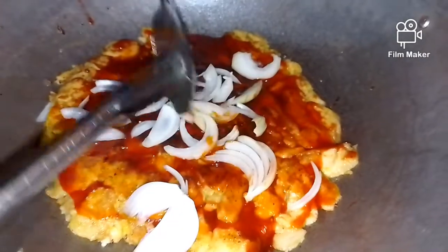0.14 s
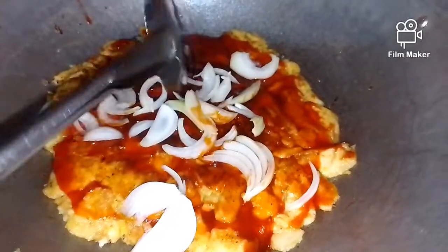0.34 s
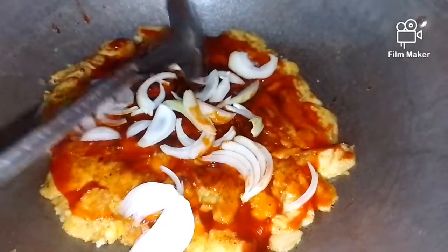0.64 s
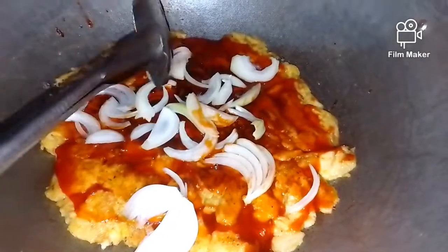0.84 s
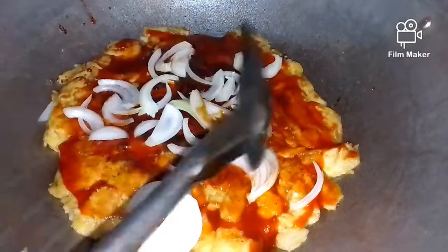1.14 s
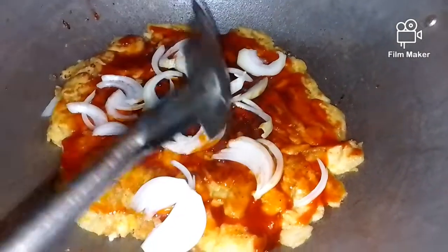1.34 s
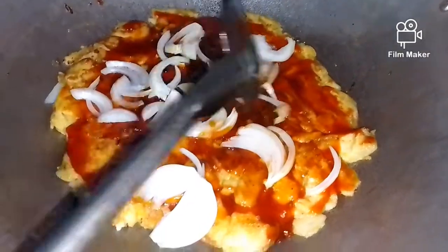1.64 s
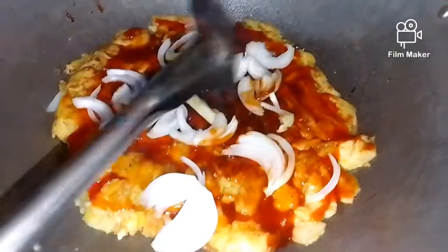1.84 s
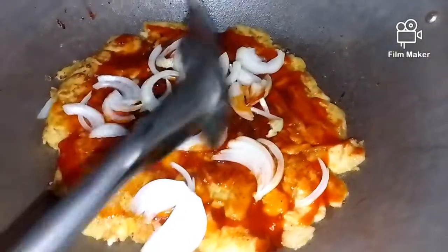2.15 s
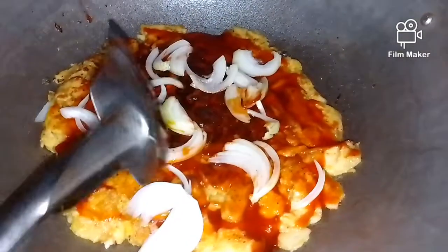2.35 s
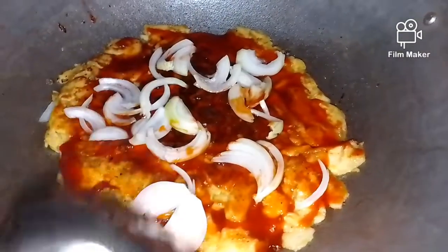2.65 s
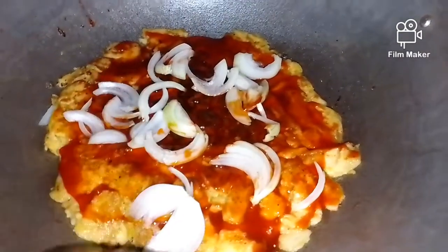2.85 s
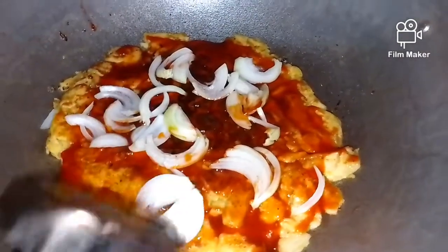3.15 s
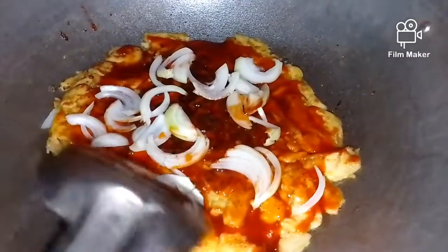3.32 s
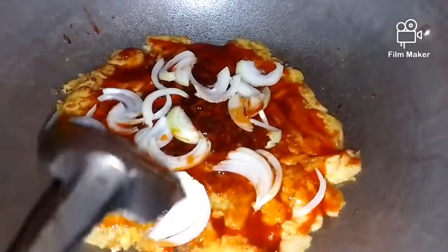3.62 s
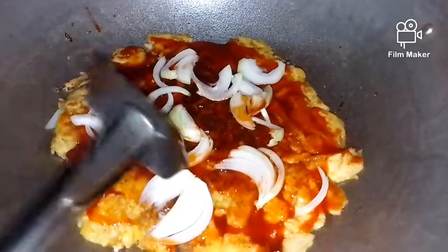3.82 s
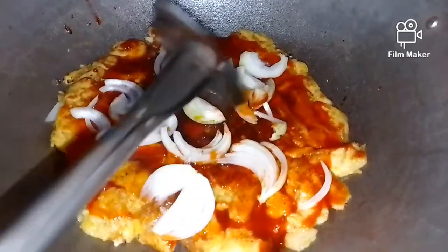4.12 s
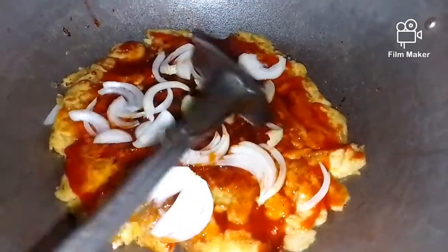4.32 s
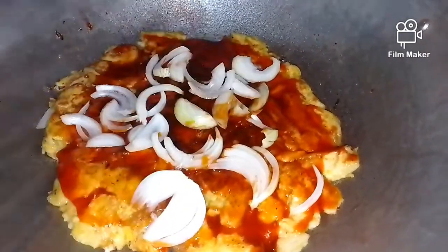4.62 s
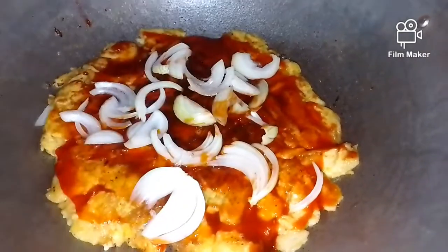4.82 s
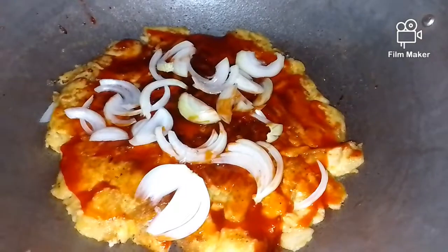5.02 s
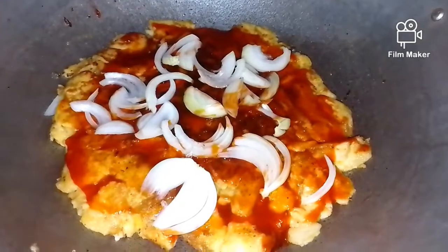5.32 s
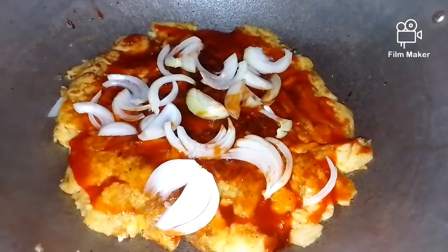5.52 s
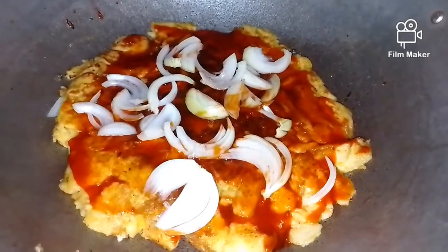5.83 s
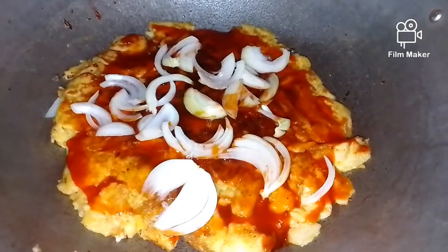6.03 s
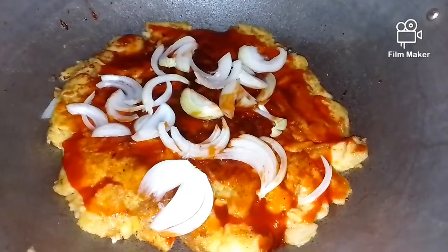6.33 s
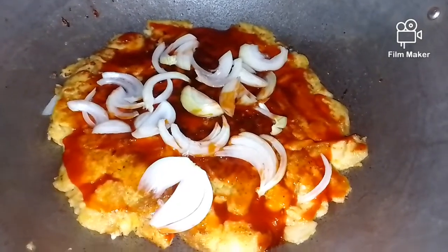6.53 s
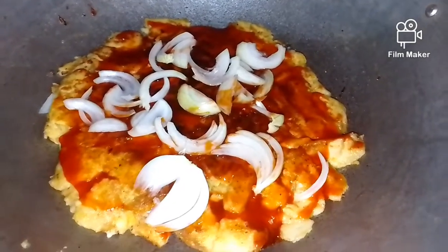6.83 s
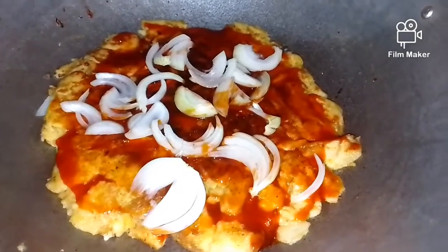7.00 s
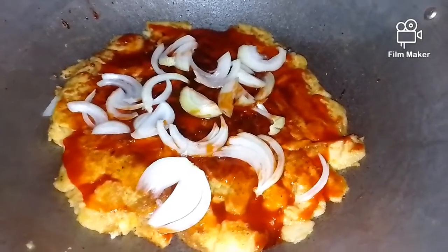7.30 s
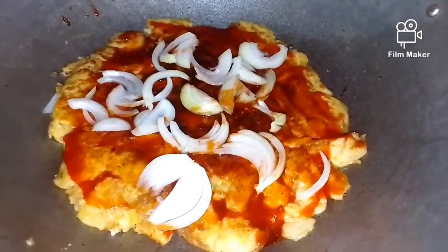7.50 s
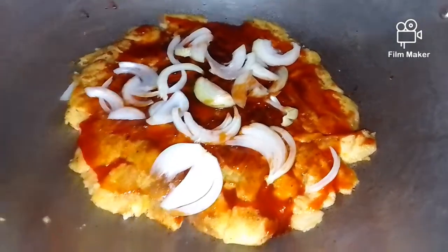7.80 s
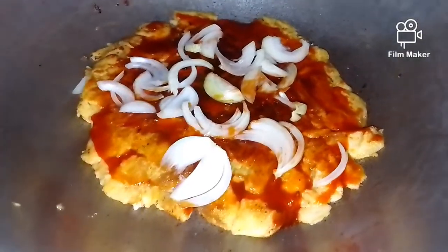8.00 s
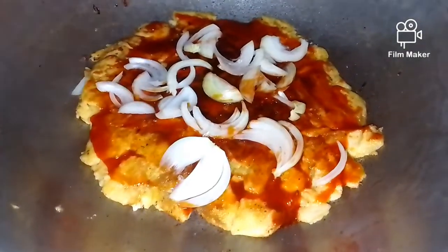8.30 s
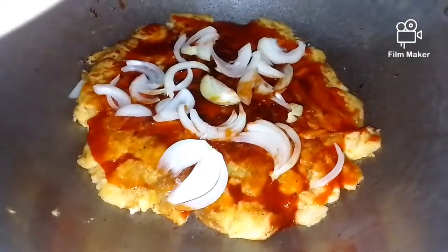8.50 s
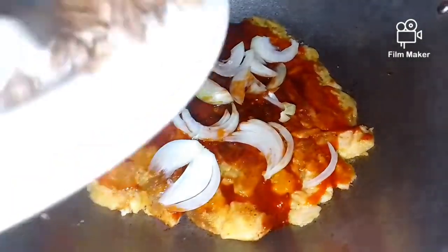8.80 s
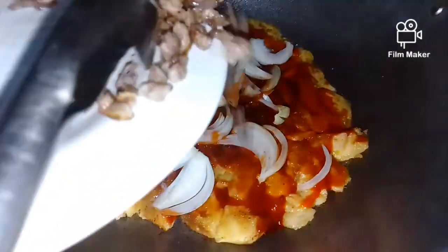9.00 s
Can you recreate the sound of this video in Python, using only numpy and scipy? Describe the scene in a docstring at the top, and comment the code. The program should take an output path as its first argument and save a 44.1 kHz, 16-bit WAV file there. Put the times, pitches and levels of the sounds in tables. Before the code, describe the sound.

A phone held near a griddle picks up sparse, light crackling at first, with a couple of soft bumps. A utensil lands with a bright double clank, scrapes and drops flat; livelier frying follows, with dull pops, fine spits and one strong snap. A faint low hum swells later beneath the rumble. Soft handling bumps precede a metallic knock and short rubbing scrapes, all in a short, small room ring.

```python
"""Food frying on a steel griddle

Steam pockets burst in clusters (short filtered clicks) and fat spits finely over a low burner rumble (noise).
A metal spatula is put down with a clank, slides and settles; later a metal dish is knocked and dragged.
Both ring as sums of fading tones. A few soft bumps are fading low tones with a rattle.
A phone close above the plate hears it all, with the short ring of a small kitchen."""
import sys
import numpy as np
from scipy import signal
from scipy.fft import rfft, irfft
from scipy.io import wavfile

SR = 44100
rng = np.random.default_rng(int(sys.argv[2]) if len(sys.argv) > 2 else 0)


def store_wav(level_fs):
    """Save 16-bit WAV to argv[1]."""
    pcm = np.round(np.clip(np.atleast_2d(level_fs), -1, 1) * 32767)
    wavfile.write(sys.argv[1], SR, pcm.T.astype(np.int16))


N = 403515
TIME = np.arange(N) / SR  # s

# tone colour of a short burst, also of metal on the plate: (frequency [Hz], level [dB])
POP_COLOUR = [(60, -11), (200, -12), (330, -7), (520, -1.5), (900, -2), (1400, -4.5), (1850, 3.5),
              (2300, -2), (2650, -9.5), (3100, -6.5), (4000, -5), (4800, -17.5), (6800, -33.5), (8000, -45),
              (11000, -43.5), (15500, -49)]
# tone colour of a droplet of fat: (frequency [Hz], level [dB])
SPIT_COLOUR = [(1000, -24), (3800, 13.5), (5300, 6), (7000, -2), (8000, -7), (11000, -9), (13000, -29),
               (15500, -39)]


def undb(db):
    """Turn decibels into a gain."""
    return 10 ** (np.asarray(db) / 20)


def unit(x):
    """Scale a sound to an average (rms) level of 1."""
    return x / np.sqrt(np.mean(x ** 2))


def swell(full_s, attack_s, hold_s, release_s, db):
    """Gain that rises, holds and dies away; attack and release each span 30 dB."""
    before = np.maximum(full_s - TIME, 0) / attack_s
    after = np.maximum(TIME - full_s - hold_s, 0) / release_s
    return undb(db - 30 * np.minimum(before + after, 10))


def fade(t, t60):
    """Exponential decay by 60 dB in t60 seconds."""
    return np.exp(-np.log(1000) * t / t60)


def through(x, response):
    """Pass a sound through an impulse response."""
    return signal.oaconvolve(x, response)[:len(x)]


def add(out, s, sound):
    """Mix a sound in at time s (seconds)."""
    i = int(s * SR)
    out[i:i + len(sound)] += sound[:len(out[i:])]


def wander(span_s):
    """Smooth random curve that changes over about span_s seconds; rms 1."""
    return unit(through(rng.standard_normal(N), np.hanning(int(span_s * SR))))


def dull_noise(size, top_hz):
    """Noise that weakens steeply above top_hz; rms 1."""
    lowpass = signal.butter(4, top_hz, fs=SR, output="sos")
    return unit(signal.sosfilt(lowpass, rng.standard_normal(size)))


def clicks(rate, spread_db, cap=4):
    """Random clicks, about rate per second, many small and a few large; rms 1."""
    out, count = np.zeros(N), int(rate * N / SR)
    when, size, sign = rng.random((count, 3)).T
    gain = undb(spread_db * np.minimum(-np.log(size), cap))
    out[(when * N).astype(int)] = np.sign(sign - .5) * gain
    return unit(out)


def colour(points, bright_db=0, bright_hz=3800, width=0.13, top_db=0, size=1024):
    """Filter response with the given spectrum, a hump at bright_hz and more or less treble."""
    hz = np.maximum(np.fft.rfftfreq(size, 1 / SR), 1)
    point_hz, point_db = np.transpose(points)
    db = np.interp(np.log(hz), np.log(point_hz), point_db)
    db = db + bright_db * np.exp(-(np.log(hz / bright_hz) / width) ** 2)
    db = db + top_db / (1 + (5500 / hz) ** 6)
    # fold the cepstrum so that the response starts at once (minimum phase)
    cepstrum = irfft(np.log(undb(db)))
    cepstrum[1:size // 2] *= 2
    cepstrum[size // 2 + 1:] = 0
    return irfft(np.exp(rfft(cepstrum)))


def ring(modes, twin_db=-9, twin_spread=.022):
    """Fading tones of alternating sign, each beating against a weaker, shorter twin close in pitch."""
    t, out = TIME[:SR // 4], 0
    for k, (hz, db, t60) in enumerate(modes):
        twin_hz = hz * (1 + twin_spread * rng.choice([-1, 1]) * rng.uniform(.5, 2))
        tone = np.sin(2 * np.pi * hz * t)
        # the twin fades by both its own decay and the shared one below
        twin = undb(twin_db) * fade(t, t60 * 2) * np.sin(2 * np.pi * twin_hz * t)
        out = out + (-1) ** k * undb(db) * fade(t, t60) * (tone + twin)
    return out


def wavering_tone(hz):
    """Steady tone whose pitch wavers slightly; rms 1."""
    cycles = np.cumsum(hz * (1 + .02 * wander(.2))) / SR
    return np.sqrt(2) * np.sin(2 * np.pi * cycles)


def burner(level_db=-53.9, hum_hz=102.3, upper_hz=135, upper_db=-7, hum_rest_db=-65):
    """Steady rumble of filtered noise, with a low hum of two wavering tones that swells once."""
    # spectrum of the rumble: (frequency [Hz], level [dB])
    rumble_colour = [(15, -7), (26, -.5), (60, 3.5), (80, 0), (135, -0.5), (200, -6.5), (290, -16.5),
                     (550, -15.5), (625, -6.5), (720, -15.5), (2000, -25), (6000, -50.5), (15000, -60.5)]
    # swell of the hum: (full from [s], attack [s], hold [s], release [s], level [dB])
    hum_swell = (6.8, 1.1, .45, 1.6, -53.5)
    rumble = unit(through(rng.standard_normal(N), colour(rumble_colour, size=8192)))
    hum = wavering_tone(hum_hz) + undb(upper_db) * wavering_tone(upper_hz)
    hum = hum * undb(1.5 * wander(.25))
    return undb(level_db) * rumble + np.maximum(swell(*hum_swell), undb(hum_rest_db)) * hum


def bumps(rattle_db=-6, rattle_t60=.07):
    """Soft bumps: a quickly fading tone with a brief rattle of noise, and a dull shuffle of handling."""
    # (time [s], level [dB], pitch [Hz], decay by 60 dB [s], top of the rattle [Hz])
    soft_bumps = [(1.0123, -30.5, 200, .027, 380), (1.539, -33, 170, .035, 520), (1.554, -37, 90, .05, 200),
                  (6.70, -38, 216, .07, 600), (7.709, -36.5, 162, .1, 1100), (7.898, -39, 720, .035, 1200),
                  (8.195, -31, 185, .14, 1150)]
    # (full from [s], attack [s], hold [s], release [s], level [dB])
    shuffle_swell = (7.71, .1, .2, .5, -46.5)
    # spectrum of the shuffle: (frequency [Hz], level [dB])
    shuffle_colour = [(50, -34), (95, 2), (260, -6), (450, -16), (1200, -24), (4000, -69)]
    out, t = np.zeros(N), TIME[:SR // 4]
    for s, db, hz, t60, rattle_hz in soft_bumps:
        tone = fade(t, t60) * np.sin(2 * np.pi * hz * t)
        rattle = dull_noise(len(t), rattle_hz) * fade(t, min(t60, rattle_t60))
        add(out, s, undb(db) * (tone + undb(rattle_db) * rattle))
    shuffle = unit(through(rng.standard_normal(N), colour(shuffle_colour)))
    return out + swell(*shuffle_swell) * shuffle


def strike(blows, modes, ring_db, clatter_db, clatter_t60, bright_db, top_db,
           thud_db=-23, thud_hz=800, thud_t60=.17):
    """Each blow rings the metal, with a short clatter of the plate beneath and its longer, low thud."""
    out, t = np.zeros(N), TIME[:SR // 4]
    plate = colour(POP_COLOUR, bright_db, width=0.87, top_db=top_db)
    for s, db in blows:
        clatter = unit(through(rng.standard_normal(len(t)), plate)) * fade(t, clatter_t60)
        thud = dull_noise(len(t), thud_hz) * fade(t, thud_t60)
        blow = undb(ring_db) * ring(modes) + undb(clatter_db) * clatter + undb(thud_db) * thud
        add(out, s, undb(db) * blow)
    # the contact takes a moment, which rounds off the highest treble
    return through(out, np.array([1, 2, 1]) / 4)


def slide(stroke, modes, grit_db, grit_top_db, soft_hz, spread, wobble, tuning=1, glide=0):
    """Tiny, uneven catches of metal on metal excite tones that waver and glide as the contact moves."""
    grip = undb(3 * unit(through(rng.standard_normal(N), np.hanning(SR // 100))))
    catches = grip * clicks(rate=1100, spread_db=3.2)
    full_s, attack_s, hold_s, release_s, _ = stroke
    start, end = full_s - attack_s, full_s + hold_s + release_s
    # glide is in octaves per s, wobble in octaves
    octaves = glide * (np.clip(TIME, start, end) - (start + end) / 2) + wobble * wander(.03)
    pitch = tuning * 2 ** octaves
    # a catch has a typical duration, so it pushes hardest around soft_hz
    band = signal.butter(1, [soft_hz / spread, soft_hz * spread], "band", fs=SR, output="sos")
    push = signal.sosfilt(band, catches)
    steady = unit(through(push, ring(modes)))
    # reading the sound faster or slower bends its pitch
    singing = np.interp(np.cumsum(pitch) % N, np.arange(N), steady)
    grit = unit(through(catches, colour(POP_COLOUR, top_db=grit_top_db)))
    return swell(*stroke) * (singing + undb(grit_db) * grit)


def dish():
    """The dish is knocked, rings until pressed down, then is dragged in short pulls that sink in pitch."""
    # blows: (time [s], level [dB])
    knocks = [(8.6993, -16.5), (8.7208, -24)]
    # tones of the ringing dish: (frequency [Hz], level [dB], decay by 60 dB [s])
    dish_modes = [(165, -14, .09), (440, -12, .05), (540, -14, .11), (680, -11, .06), (850, -11, .05),
                  (995, -14, .08), (1077, 0, .13), (1442, -1, .07), (1608, -16, .12), (1743, -16, .12),
                  (2319, -12, .08), (3300, -14, .04), (4050, -12, .04), (6600, -19, .04)]
    # (full from [s], hold [s], level [dB], where the catches push hardest [Hz], pitch ratio [1])
    drags = [(8.762, .03, -47, 4600, 1.0), (8.815, .055, -43.5, 2100, 1.0), (8.922, .025, -44, 900, .93)]
    # tones of the dragged dish at pitch ratio 1: (frequency [Hz], level [dB], decay by 60 dB [s])
    rub_modes = [(600, -7, .05), (845, 2, .08), (1190, -1, .03), (1820, 2, .07), (2060, -1, .04),
                 (3500, 5, .008), (6000, 0, .005)]
    edge_s = .07  # attack and release of a pull
    pressed_s, pressed_t60 = 8.738, .06  # pressing the dish down chokes its ring
    blows = strike(knocks, dish_modes, ring_db=-3.5, clatter_db=-6.5, clatter_t60=.05,
                   bright_db=4.5, top_db=19)
    out = blows * fade(np.maximum(TIME - pressed_s, 0), pressed_t60)
    for s, hold_s, db, hz, tuning in drags:
        out += slide((s, edge_s, hold_s, edge_s, db), rub_modes, grit_db=-4, grit_top_db=12,
                     soft_hz=hz, spread=1.6, tuning=tuning, glide=-.8, wobble=.008)
    return out


def spatula_modes(flat):
    """The spatula's tones for a contact between its edge (0) and its flat (1)."""
    # (frequency [Hz], level on the edge [dB], level on the flat [dB], decay by 60 dB [s])
    blade = [(945, -7, 0, .08), (1104, -6, -13, .14), (1500, -10, -9, .15), (1670, -6, -10, .09),
             (1790, -10, -4, .08), (1890, -6, -1, .11), (2116, -7, -11, .12), (2205, 0, -12, .08),
             (2400, -4, -17, .045), (3149, -4, -17, .15), (3262, -6, -14, .11), (3355, -7, 0, .07),
             (3511, -5, -8, .13), (3790, -5, -8, .09), (3990, -6, -6, .07), (4185, -3, -6, .07),
             (4545, -6, -12, .07), (4891, -7, -9, .06), (5200, -11, -18, .07), (7300, -17, -34, .03),
             (9500, -18, -38, .03)]
    return [(hz, edge_db + flat * (flat_db - edge_db), t60) for hz, edge_db, flat_db, t60 in blade]


def spatula(flat_dull_db=9):
    """The spatula lands on its edge, bounces, slides and drops flat with a duller clink."""
    # blows: (time [s], level [dB], contact [0 = edge to 1 = flat])
    clanks = [(2.7858, -19.5, 0), (2.7975, -26, 0), (3.0367, -30, 1)]
    # (full from [s], attack [s], hold [s], release [s], level [dB])
    stroke = (2.922, .07, .036, .07, -34.5)
    out = slide(stroke, spatula_modes(1), grit_db=-5, grit_top_db=9,
                soft_hz=1600, spread=1.6, wobble=.008)
    for s, db, flat in clanks:
        out += strike([(s, db)], spatula_modes(flat), ring_db=-3.5, clatter_db=-3, clatter_t60=.08,
                      bright_db=5, top_db=17 - flat_dull_db * flat)
    return out


def spits(level_db=4):
    """Single droplets of fat snap or sizzle away in a moment of tiny splashes: fading noise."""
    # (time [s], peak before level_db is added [dB], decay by 60 dB [s])
    droplets = [(3.4264, -40, .006), (4.2946, -37, .008), (4.9417, -43, .015), (5.31, -42, .006),
                (5.4735, -41, .006), (5.553, -44, .02), (5.9569, -38, .012), (8.066, -46, .05)]
    out, droplet, t = np.zeros(N), colour(SPIT_COLOUR), TIME[:SR // 20]
    for s, db, t60 in droplets:
        snap = through(rng.standard_normal(len(t)) * fade(t, t60), droplet)
        add(out, s, undb(db + level_db) * snap / np.abs(snap).max())
    return out


def burst(bright_db, width=0.34, body_db=0, size_scatter=.06):
    """One short burst, with a pitch and sharpness of its own and a quick reflection; peak 1."""
    pitch, sharpness, path, size = rng.standard_normal(4)
    # bigger pockets sound lower
    shift = np.exp(-size_scatter * size)
    body = [(hz * shift, db + body_db * (hz < 1500)) for hz, db in POP_COLOUR]
    h = colour(body, bright_db, 3700 * np.exp(.09 * pitch), width, top_db=3 * sharpness)
    # the middle and upper frequencies lag, so the pressure swings both ways
    h = signal.lfilter([.7, -1.63, 1], [1, -1.63, .7], h)
    h = signal.lfilter([.45, -1.15, 1], [1, -1.15, .45], h)
    n = np.arange(len(h))
    delay_s = .00092 + .00008 * path
    h = h + .35 * np.interp(n - delay_s * SR, n, h, left=0)
    return h / np.abs(signal.hilbert(h)).max()


def crackle(rate, bright_db, width, count=8):
    """Little bursts from several spots, each spot with its own colour; rms 1."""
    out = np.zeros(N)
    for _ in range(count):
        out += through(clicks(rate, spread_db=4.5, cap=3.3), burst(bright_db, width))
    return unit(out)


def heat(s):
    """How hard it fries at time s: a level in dB that guides the crackle."""
    # (time [s], level [dB])
    frying_levels = [(0, -61), (.7, -64), (1.2, -60), (2.7, -57.5), (3.05, -50), (3.8, -55), (4.5, -50.5),
                     (4.9, -55), (5.65, -50.5), (6.2, -54), (7.4, -51), (8.6, -55.5), (9.15, -53)]
    return np.interp(s, *np.transpose(frying_levels))


def frying(dull_db=-3, pip_db=-64, fizz_db=-5.5, spit_db=0, hiss_db=-6.5):
    """Dull bursts come in flurries over a dense fizz; small bubbles pip and droplets of fat tick on top."""
    # the fat spits quietly, flares up after the spatula lands, then calms down
    calm_db, flare_db = -77, -64.5
    flare_s, attack_s, fall_db_per_s = 3.05, .3, 1.3
    flare = swell(flare_s, attack_s, 0, 30 / fall_db_per_s, flare_db)
    flurry = undb(4.5 * wander(.05))
    dull = unit(flurry * crackle(rate=45, bright_db=-4, width=0.23))
    pips = crackle(rate=9, bright_db=12, width=.24)
    fizz = unit(through(clicks(rate=2500, spread_db=2.8), colour(POP_COLOUR, top_db=-7)))
    droplet = colour(SPIT_COLOUR)
    spit = unit(through(np.sqrt(flurry) * clicks(rate=120, spread_db=5, cap=3), droplet))
    hiss = unit(through(flurry * clicks(rate=1200, spread_db=3.5), droplet))
    bubbles = undb(dull_db) * dull + undb(fizz_db) * fizz
    fat = undb(spit_db) * spit + undb(hiss_db) * hiss
    return bubbles * undb(heat(TIME)) + fat * np.maximum(flare, undb(calm_db)) + undb(pip_db) * pips


def lesser_pops(count=36, bright_db=.5, bright_scatter_db=6):
    """Chance bursts with the columns of the table in scene(), stronger the harder it fries."""
    above_heat_db, scatter_db, mean_length_s = 17, 1.7, .005
    when, size, length, bright = rng.random((count, 4)).T
    s = (np.arange(count) + when) / count * N / SR
    # sqrt(12) gives an even spread a standard deviation of 1
    db = heat(s) + above_heat_db + scatter_db * np.sqrt(12) * (size - .5)
    length_s = -mean_length_s * np.log(length)
    brightness = bright_db + bright_scatter_db * np.sqrt(12) * (bright - .5)
    return list(zip(s, db, length_s, brightness))


def pops(bursts, level_db=.5, after_db=-13, after_rate=700, steam_db=-42,
         repeat_db=-3.5, repeat_gap_s=.008, ring_width=.34):
    """Each short burst may repeat quickly; smaller ones follow and a little steam sizzles briefly."""
    # bursts gain body as the food cooks; the plain colour is reached at plain_s
    body_db_per_s, plain_s, body_scatter_db = .6, 4.8, 1.5
    out, t, droplet = np.zeros(N), TIME[:SR // 10], colour(SPIT_COLOUR)
    for s, db, length, bright_db in bursts:
        body_db = body_db_per_s * (s - plain_s) + body_scatter_db * rng.standard_normal()
        width = ring_width * undb(-max(bright_db, 0) / 2)  # bright bursts ring more narrowly
        pop = lambda: burst(bright_db + 4.5, width, body_db)
        add(out, s, undb(db + level_db) * pop())
        for late in np.arange(length, repeat_gap_s / 4, -repeat_gap_s):
            slip, size = rng.uniform(-1, 1, 2)
            add(out, s + late + slip * repeat_gap_s / 3, undb(db + repeat_db + 3 * size) * pop())
        dying = np.maximum(t - length / 2, 0)
        hits = rng.random(len(t)) < after_rate / SR
        followers = hits * rng.uniform(-2.7, 2.7, len(t)) * fade(dying, .05)
        after = through(followers, burst(bright_db / 2 + 4, width, body_db))
        steam = unit(through(rng.laplace(size=len(t)), droplet)) * fade(dying, .14)
        steam = steam * undb(4 * rng.standard_normal())
        add(out, s, undb(db + after_db) * after + undb(db + steam_db) * steam)
    return out


def kitchen(x, wet_db=-13, t60=0.24, gap_s=0.0037):
    """Nearby walls return a short, diffuse tail: fading noise that starts after a small gap."""
    t = TIME[:SR // 2]
    tail = rng.standard_normal(len(t)) * fade(t, t60) * (t > gap_s)
    return x + undb(wet_db) * through(x, tail / np.linalg.norm(tail))


def scene():
    """Frying and utensils ring in the kitchen; the burner is added without that ring."""
    # short bursts and clicks; dull ones near 3 s and 8.8 s may be metal rattling.
    # Levels are before the shifts in pops():
    # (time [s], peak [dB], how long quick repeats go on [s], brightness [dB])
    short_bursts = [(0.247, -36, 0.019, 5), (0.524, -30, 0, 2), (0.762, -32, 0.016, -1),
                    (0.801, -25, 0, -1), (0.9505, -29, 0.012, 1), (1.033, -30, 0, -5), (1.074, -29, 0, 10),
                    (1.109, -32, 0, 6), (1.239, -29, 0.007, -5), (1.378, -32, 0.009, -5),
                    (1.446, -29, 0.003, -5), (1.502, -34, .011, 4), (1.591, -32, 0.024, -2),
                    (1.741, -30, 0.023, -5), (1.989, -25, 0.01, -2), (2.005, -23, 0, -4),
                    (2.078, -25, 0.015, -8), (2.18, -32, 0, -12), (2.221, -34, .03, 4),
                    (2.339, -26, 0, -14), (2.385, -26, 0.037, -8), (2.567, -30, 0.008, -5),
                    (2.679, -26, 0, -13), (2.856, -27, 0, -13), (2.992, -21, 0.005, -7),
                    (3.02, -23, 0, -11), (3.092, -20, 0, -14), (3.114, -28, 0, 2), (3.345, -26, 0, -5),
                    (3.401, -27, 0.021, 2), (3.542, -27, 0.037, -5), (3.714, -29, 0, 6),
                    (3.7255, -13, 0, -8), (3.779, -30, .003, 4), (4.066, -22, 0.008, -4),
                    (4.083, -20, 0.006, -7), (4.106, -26, 0.011, -5), (4.197, -29, .025, -7),
                    (4.319, -30, .014, -6), (4.484, -28, 0, -9), (4.514, -25, 0.023, -3),
                    (4.696, -27, 0.04, -3), (5.049, -28, 0.022, 1), (5.096, -27, 0, -2),
                    (5.212, -29, 0, -2), (5.235, -28, 0.014, 2), (5.276, -26, 0, 0),
                    (5.415, -28, 0.037, -5), (5.599, -29, 0, 7), (5.627, -26, .012, -4),
                    (5.752, -29, .008, -2), (5.852, -29, .009, -3), (5.905, -29, .016, -4),
                    (5.957, -30, .01, 1), (5.997, -25, 0, -10), (6.348, -30, 0.021, -1),
                    (6.681, -29, 0.033, -4), (6.901, -27, 0.028, 1), (6.994, -27, 0, -6),
                    (7.054, -29, .003, -10), (7.141, -22, 0, -4), (7.176, -25, 0.014, -6),
                    (7.212, -21, 0, -6), (7.305, -25, 0.021, -3), (7.392, -24, 0, -6), (7.472, -29, 0, 4),
                    (7.524, -30, .027, -4), (7.867, -31, .005, -2), (7.898, -25, 0, -4),
                    (8.182, -27, 0, -8), (8.314, -32, 0, -5), (8.528, -30, 0, -2), (8.817, -29, 0, -11),
                    (8.842, -25, 0, 1), (8.969, -27, 0, -7)]
    popping = pops(short_bursts + lesser_pops())
    close = popping + spits() + frying() + spatula() + dish() + bumps()
    return (kitchen(close) + burner())[None]


def record(dry, soften_hz=14300, top_hz=15700):
    """The phone softens the highest treble and cuts the top."""
    gentle = signal.butter(3, min(soften_hz, .45 * SR), fs=SR, output="sos")
    steep = signal.ellip(8, .2, 70, top_hz, fs=SR, output="sos")
    return signal.sosfilt(steep, signal.sosfilt(gentle, dry))


dry = scene()
out = record(dry)
store_wav(out)
```